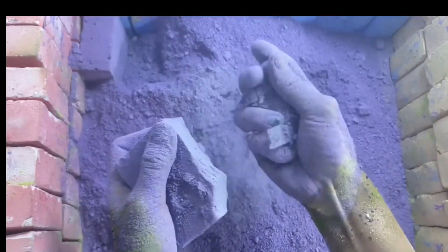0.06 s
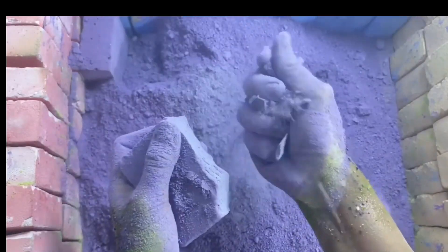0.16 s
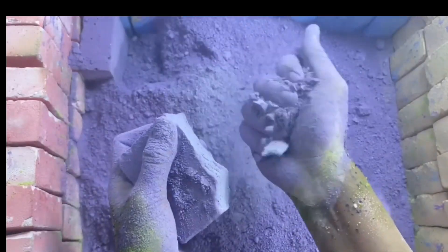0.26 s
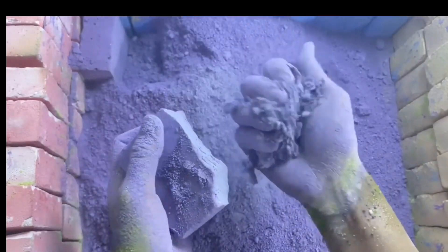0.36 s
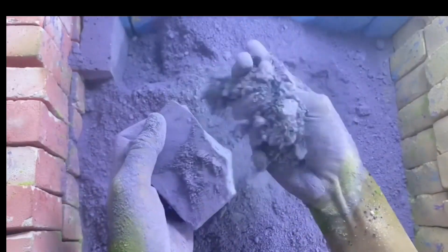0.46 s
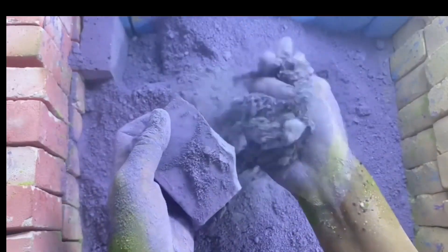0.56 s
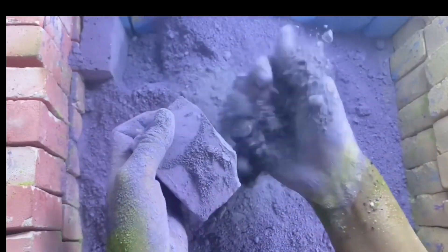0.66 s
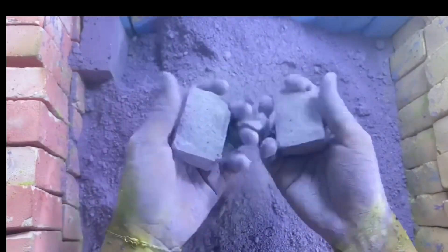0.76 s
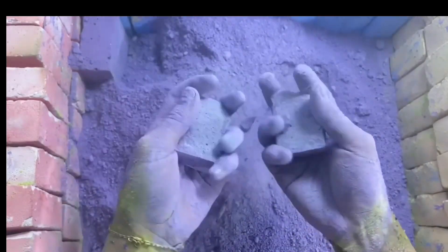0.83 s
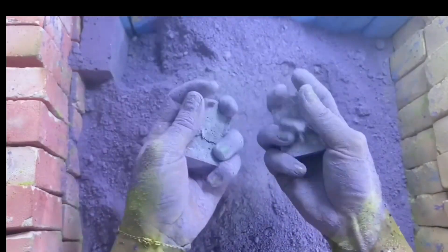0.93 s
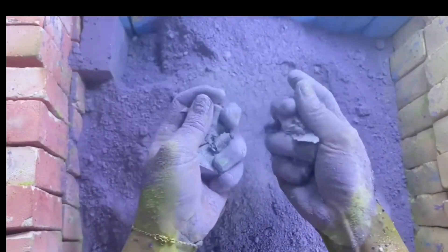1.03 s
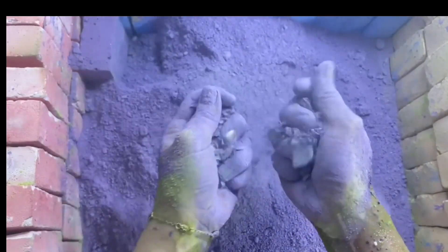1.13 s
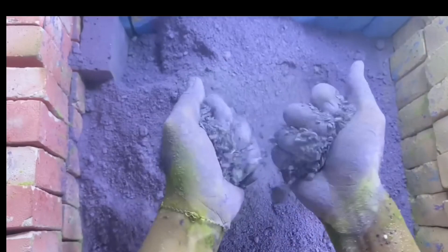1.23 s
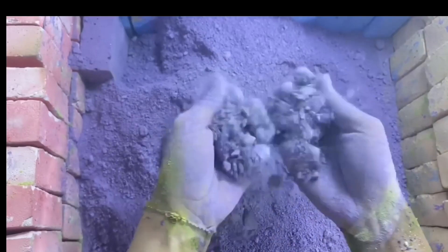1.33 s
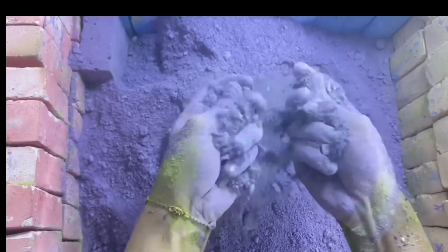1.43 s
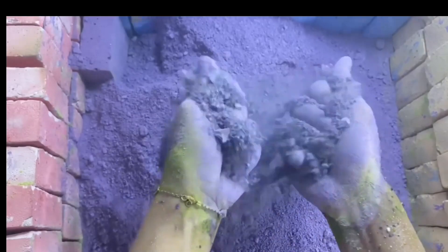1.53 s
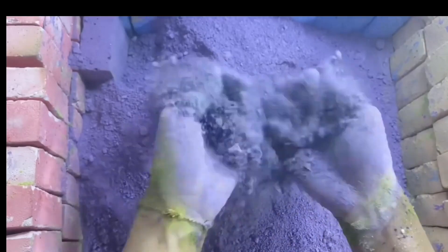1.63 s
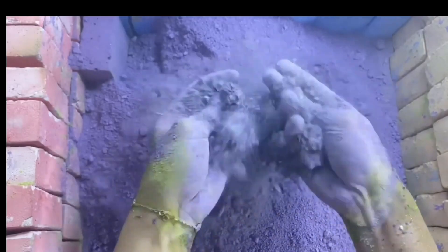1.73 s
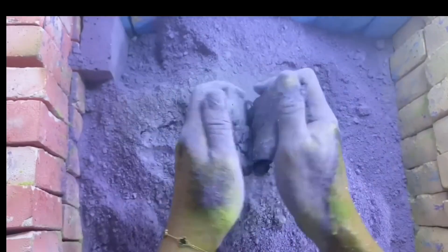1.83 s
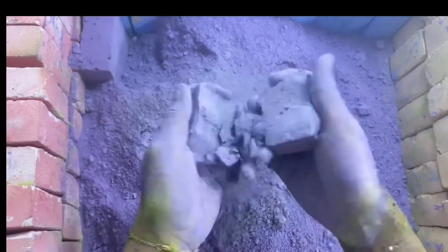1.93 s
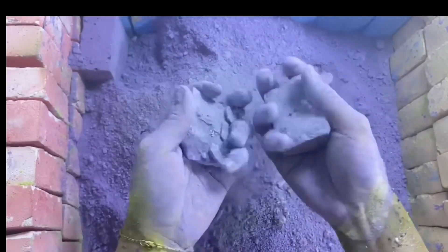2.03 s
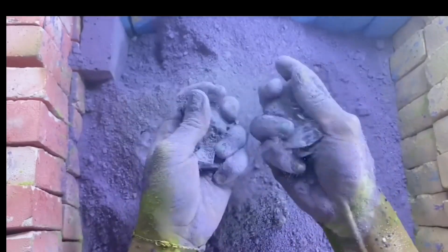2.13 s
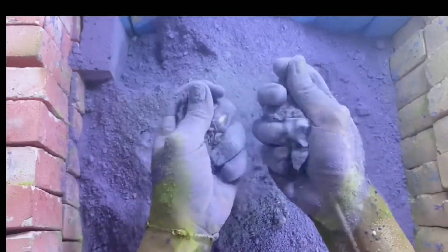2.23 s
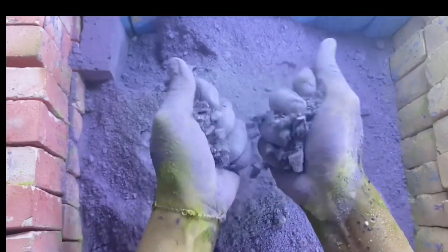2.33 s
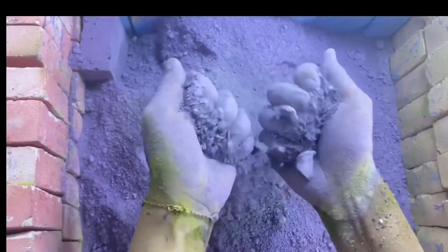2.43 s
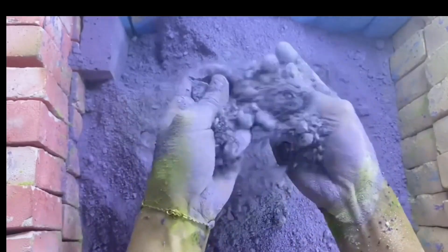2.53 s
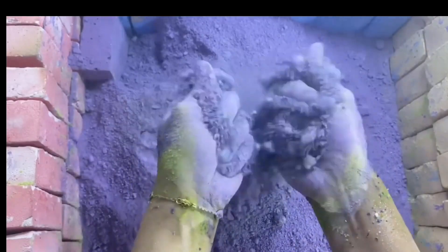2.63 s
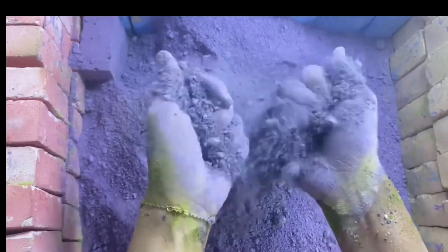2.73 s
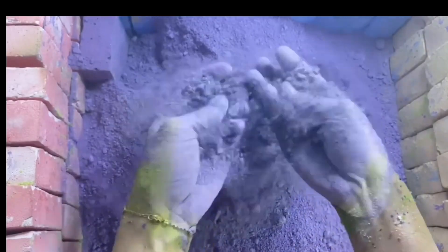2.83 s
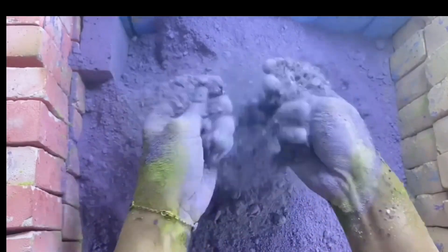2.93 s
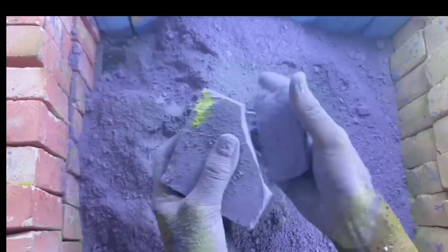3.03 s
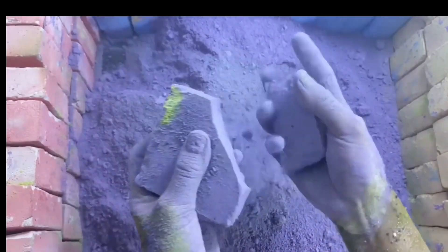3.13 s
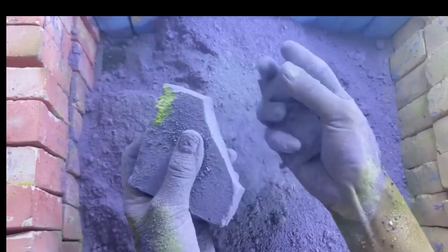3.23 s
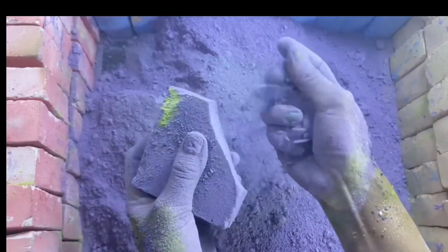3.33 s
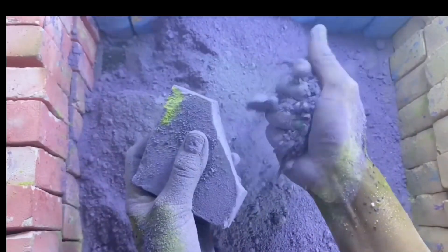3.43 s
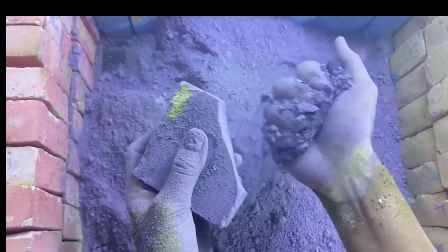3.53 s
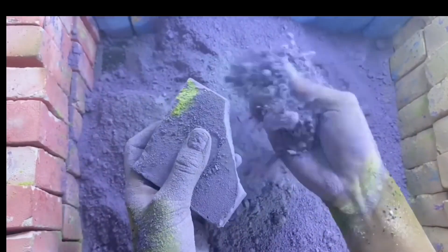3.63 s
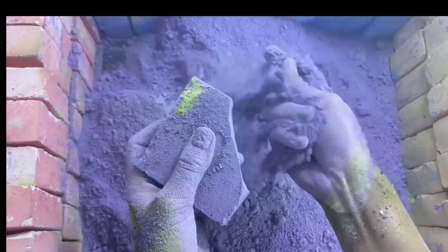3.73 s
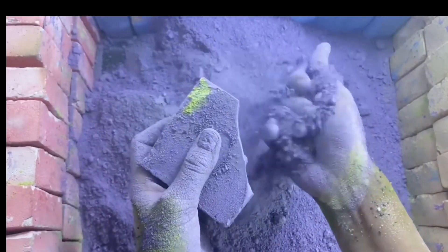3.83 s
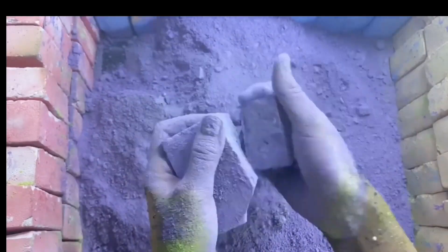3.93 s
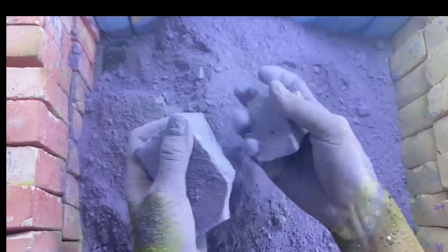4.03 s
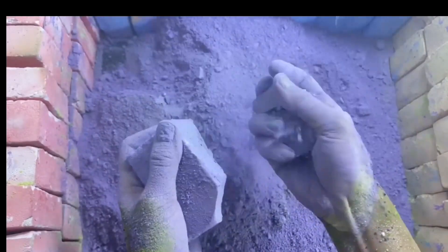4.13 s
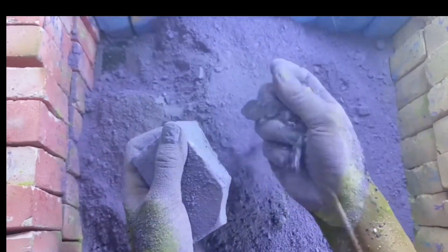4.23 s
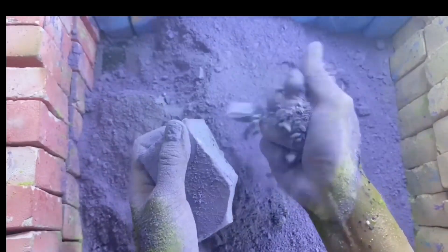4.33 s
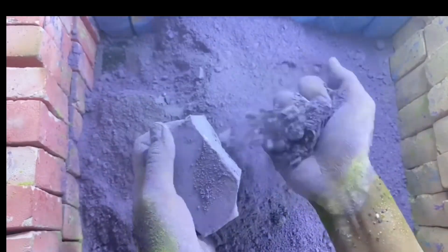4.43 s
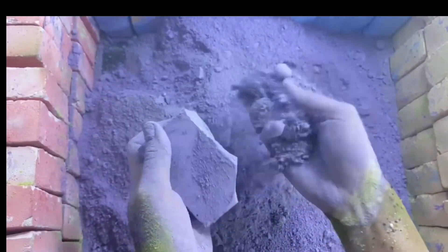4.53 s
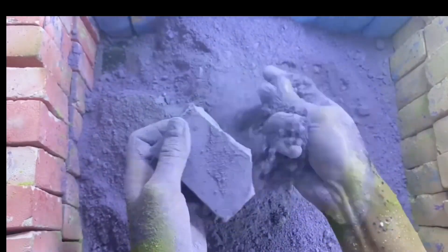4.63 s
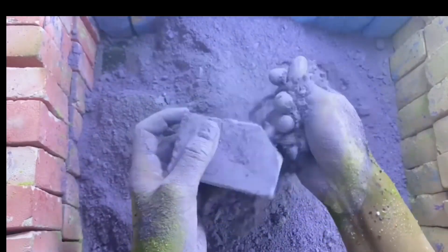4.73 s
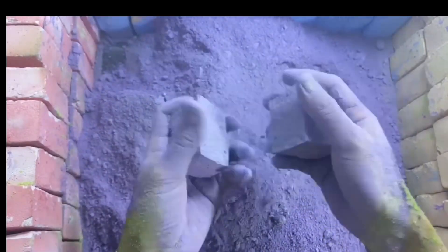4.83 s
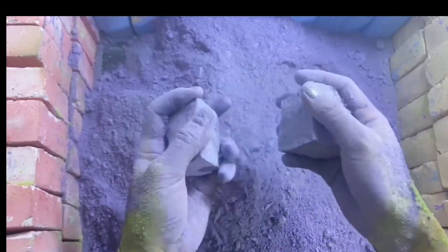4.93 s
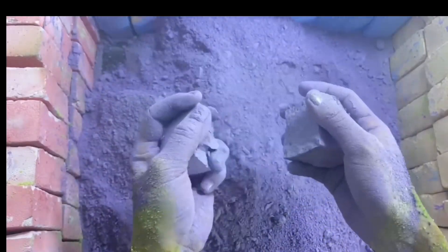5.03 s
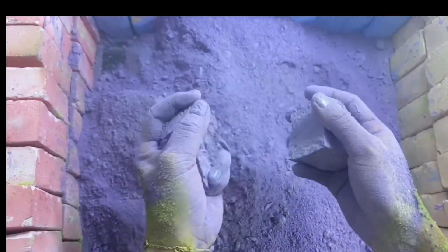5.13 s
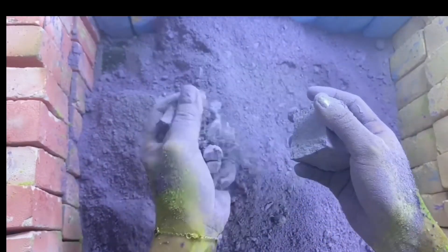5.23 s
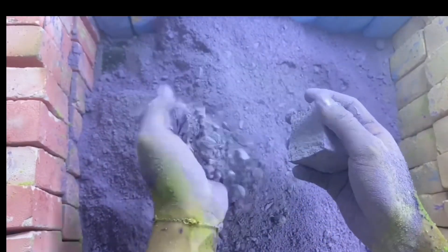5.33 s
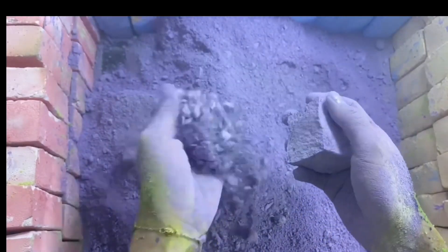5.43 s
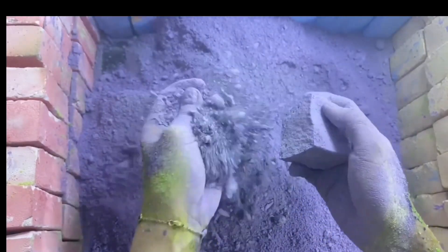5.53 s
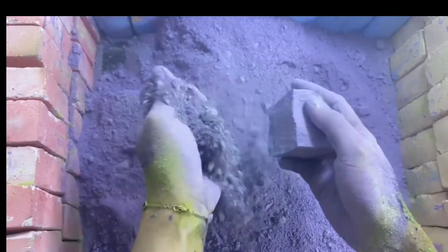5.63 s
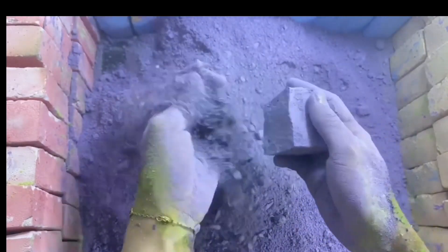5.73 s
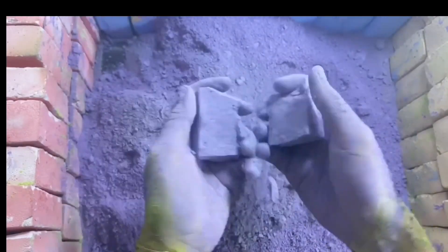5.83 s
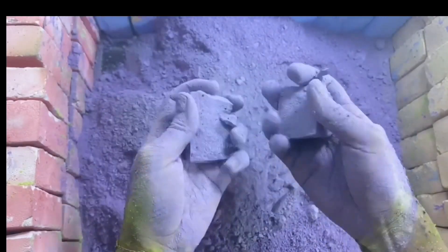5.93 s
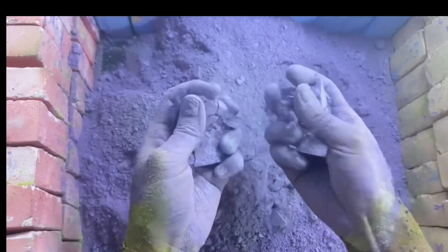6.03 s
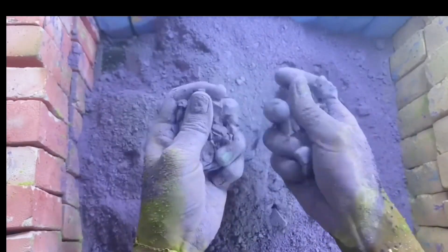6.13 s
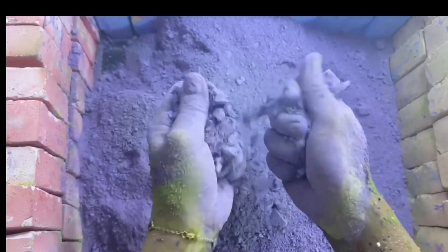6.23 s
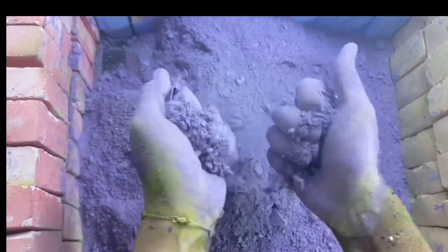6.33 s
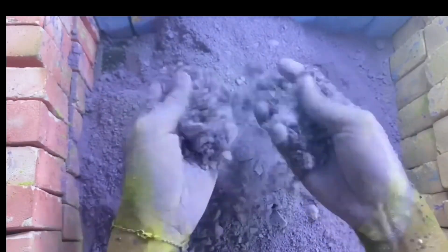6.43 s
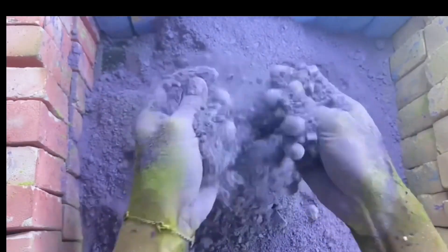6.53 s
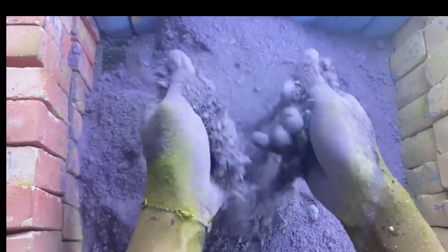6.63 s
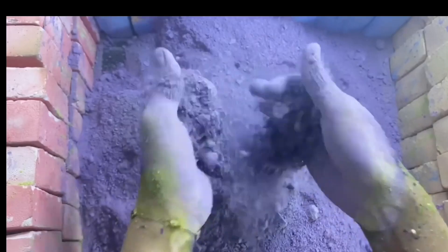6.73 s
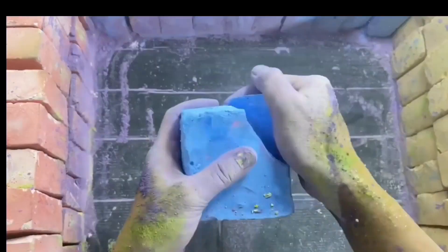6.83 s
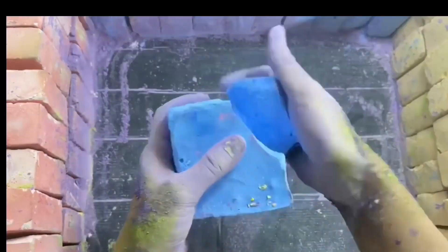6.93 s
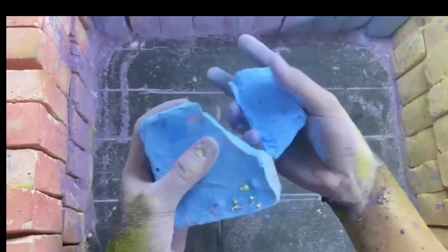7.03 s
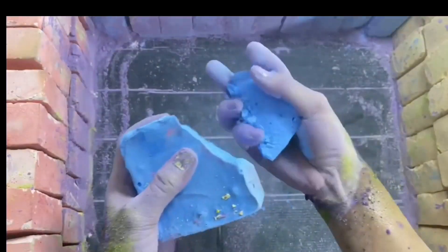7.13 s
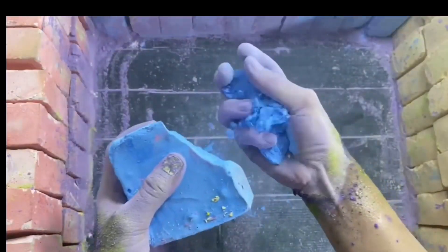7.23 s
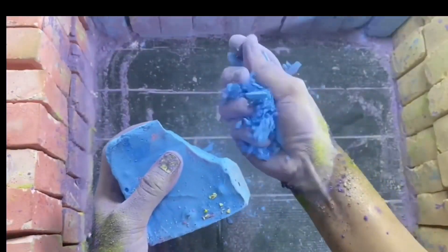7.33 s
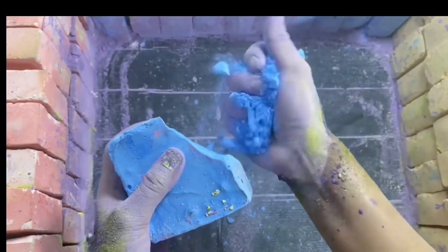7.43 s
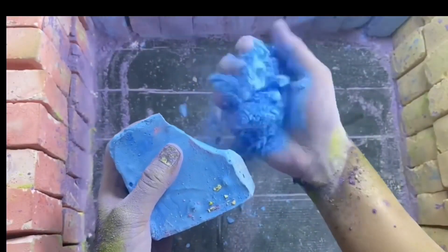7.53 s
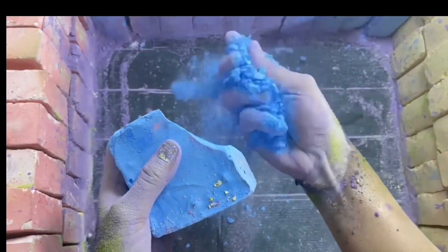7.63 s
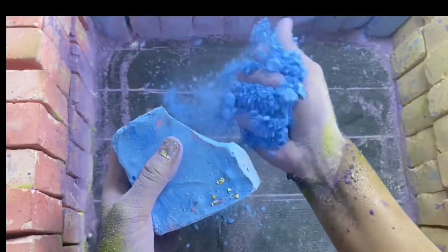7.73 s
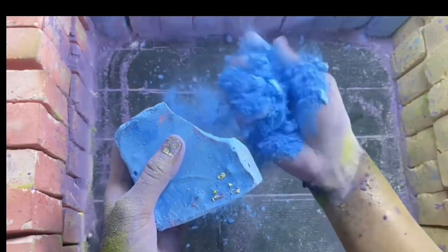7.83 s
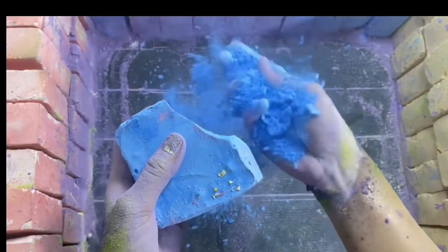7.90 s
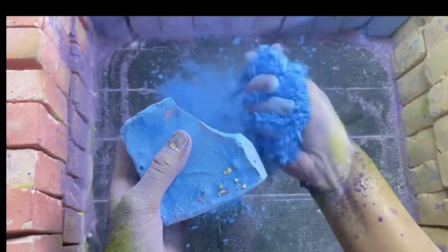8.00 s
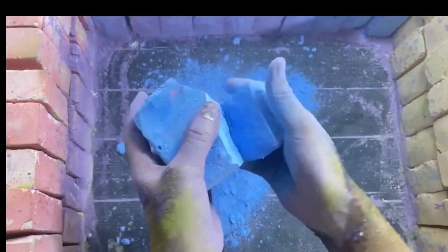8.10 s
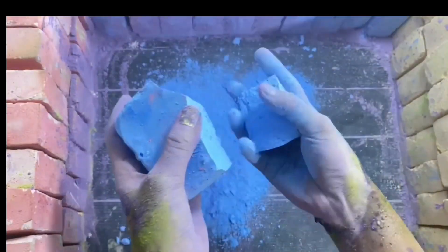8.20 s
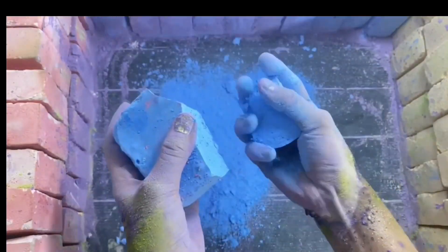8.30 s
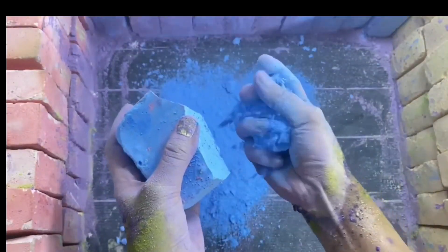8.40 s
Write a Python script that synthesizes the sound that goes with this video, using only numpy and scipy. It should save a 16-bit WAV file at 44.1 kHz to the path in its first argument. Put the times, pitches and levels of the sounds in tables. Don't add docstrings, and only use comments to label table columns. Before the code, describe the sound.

Close, dry and gritty: hands crush chalk blocks in rapid separate takes with abrupt cuts. A sharp crackling crunch opens at once, followed by a weaker one at 0.35 seconds. Faint skin rustle and ticks lead to strong fractures at 1.0, 2.15, 3.25, 4.2, 5.1 and 6.05, the one at 2.15 especially hard. Each bursts into tiny cracks, then eases into raining crumbs, dropping chunks and soft powder hiss on the pile, over a hollow tub resonance and low muffled boom. A short tick and thud come at 6.8. From 7.0 fragments strike a bare hard floor: brighter, with a crunch near 7.2, knocks around 7.3, and a loud clattering pour peaking at 7.6 to 7.7, slightly clipped. Bright dregs patter until 8.1, then a near-quiet moment and a final snap around 8.35. Short nearby reflections, faint steady hiss.

```python
import sys
import numpy as np
from scipy import signal
from scipy.fft import rfft, irfft, next_fast_len
from scipy.io import wavfile
from scipy.ndimage import uniform_filter1d, map_coordinates

SR = 44100
rng = np.random.default_rng(int(sys.argv[2]) if len(sys.argv) > 2 else 0)


def ratio_of_db(decibels):
    return 10 ** (np.asarray(decibels, float) / 20)


def transcribe(u):
    v = np.clip(np.atleast_2d(u).T, -1, 1)
    q = np.round(v * 32767).astype(np.int16)
    wavfile.write(sys.argv[1], SR, q)


N = 373086

# [start t/s, hush of the crumbs level/dB, rustle of the hands level/dB, tub level/dB, stand level/dB]
TAKES = [(0.0, -34.5, -50, -33.5, -37.5), (0.3, -51.5, -49, -33.5, -35.5),
         (0.74, -50.5, -44.5, -33.5, -36.5), (1.843, -57.5, -47.5, -33, -34.5),
         (3.015, -52, -43, -35, -34.5), (3.939, -51.5, -48, -34, -33.5), (4.838, -55, -44.5, -32, -31.5),
         (5.806, -58.5, -45.5, -34, -34), (6.792, -69, -60, -36, -31.5), (7.0, -47, -50, -33.5, -36.5),
         (8.103, -46.5, -48, -30.5, -33.5)]
# [block gives t/s, hardest t/s, hardest level/dB, easing time/s, rain of crumbs level/dB]
SQUEEZES = [(0.016, 0.06, -21.5, 0.3, -39), (0.353, 0.384, -37.5, 0.26, -37),
            (0.97, 1.018, -18, 0.22, -33.5), (2.096, 2.168, -23.5, 0.23, -33.5),
            (3.236, 3.26, -27.5, 0.23, -35.5), (4.141, 4.173, -26, 0.22, -34),
            (5.003, 5.11, -29.5, 0.63, -41), (6.012, 6.1, -22.5, 0.38, -35), (6.808, 6.804, -26, 0.15, -52),
            (7.175, 7.273, -27, 0.21, -38), (8.34, 8.385, -28, 0.067, -34)]
# [crumbs thicken dB/s, powder over its usual share level/dB, powder thickens dB/s]
RAINS = [(-3, 0, 0.1), (3, 1, 12), (-0.5, -2, 6), (2.5, 0.1, 0.5), (-1, 0, 6), (-13, 1, 7), (-1.5, 1, 10),
         (4.5, -1.5, 9.5), (0.5, 5, 2), (-1.5, -8, 0.1), (-1.5, -2, 0.1)]


def unit(x):
    return x / np.sqrt(np.mean(x ** 2) + 1e-20)


def along(points, hz):
    f, v = np.transpose(points)
    return np.interp(np.log(hz + 1), np.log(f + 1), v)


def wobble(rate):
    return map_coordinates(rng.standard_normal(int(N * rate / SR) + 4), [np.arange(N) * rate / SR])


def filtered(x, response):
    m = next_fast_len(N + SR // 2)
    gain = response(np.fft.rfftfreq(m, 1 / SR))
    gain = gain / np.sqrt(np.mean(np.abs(gain) ** 2))
    return irfft(rfft(x, m) * gain, m)[..., :N]


def colour(points):
    return lambda hz: ratio_of_db(along(points, hz))


def modes(table):
    def response(f):
        total = 0
        for k, (centre, width, db) in enumerate(table):
            band = 1j * f * width
            total = total + (-1) ** k * ratio_of_db(db) * band / (centre ** 2 - f * f + band)
        return total
    return response


def pair(alike):
    turn = np.arccos(np.clip(alike, -1, 1)) / 2
    a, b = rng.standard_normal((2, N))
    common, apart = np.cos(turn) * a, np.sin(turn) * b
    return np.array([common + apart, common - apart])


def patchy(x, depth_db):
    z = signal.stft(x, nperseg=256)[2]
    field = uniform_filter1d(rng.standard_normal(z.shape[1:]), size=5, axis=0)
    field = uniform_filter1d(field, size=7, axis=1)
    return unit(signal.istft(z * ratio_of_db(depth_db * unit(field)), nperseg=256)[1][:, :N])


def grains(rate, spread_db, life, bed):
    sizes = ratio_of_db(spread_db * np.minimum(rng.exponential(size=N), 3))
    starts = (rng.random(N) < rate / SR) * sizes
    train = signal.lfilter([1], [1, -np.exp(-1 / (life * SR))], starts)
    return unit(bed + unit(train))


def pings(count, spread_db, life, low_hz, high_hz):
    when, pitch, size, side, lag = rng.random((count, 5)).T[:, :, None]
    hz = low_hz * (high_hz / low_hz) ** pitch
    k = np.arange(200)
    t = k / SR
    level = ratio_of_db(-spread_db * np.log(size + 0.037)) * (hz / low_hz) ** 0.99
    ring = level * np.sin(2 * np.pi * hz * t) * np.exp(-t / (life * np.sqrt(low_hz / hz)))
    start = (when * N).astype(int) + k
    late = (lag * 24).astype(int)
    left = np.bincount(start.ravel(), (ring * np.sqrt(side)).ravel(), N)
    right = np.bincount((start + late).ravel(), (ring * np.sqrt(1 - side)).ravel(), N)
    return unit(np.array([left[:N], right[:N]]))


def steady_hiss():
    # [f/Hz, level per Hz/dB]
    air = [(300, -39), (820, 20), (1050, -5), (2500, -44), (5000, -8), (10000, 3.5), (14000, 6),
           (16000, -25)]
    return ratio_of_db(-48.5) * filtered(pair(.1), colour(air))


def walls(x):
    # [f/Hz, t60/s]
    wall_decay = [(300, 0.16), (2000, 0.083), (10000, 0.0057)]
    hz, t, z = signal.stft(rng.standard_normal((2, SR // 4)), SR, nperseg=256)
    decay = ratio_of_db(-60 * t / along(wall_decay, hz)[:, None])
    tail = signal.istft(z * decay, SR, nperseg=256)[1]
    return signal.fftconvolve(x, tail / np.linalg.norm(tail[0]), axes=1)[:, :N]


def cut_off():
    hard_cuts = [0.739, 1.843, 3.015, 3.938, 5.806, 6.793, 8.102]
    t = np.arange(N) / SR
    starts = np.r_[-1, hard_cuts]
    since = t - starts[np.searchsorted(starts, t, 'right') - 1]
    return ratio_of_db(-13.5 * np.exp(-since / 0.015))


def thuds():
    # [t/s, level/dB]
    landings = [(0.04, -10), (2.161, -7.5), (3.69, -13), (4.15, -13), (5.601, -17.5), (6.82, -17),
                (7.298, -15), (8.34, -15)]
    s, db = np.transpose(landings)
    return np.bincount((s * SR).astype(int), ratio_of_db(db + 19), N)


def hollow_tub(shaking, boom, push):
    # [f/Hz, width/Hz, level/dB]
    tub_modes = [(312.8, 32, 1), (387, 22.7, -3), (467.3, 23.4, -2.5)]
    # [f/Hz, width/Hz, level/dB]
    stand_modes = [(44.5, 34, -15.5), (95, 23.3, -0.5), (127.6, 30.3, -5), (194, 132, -19)]
    tub = filtered(shaking * pair(0.92) + push, modes(tub_modes))
    stand = filtered(boom * pair(0.92) + push + thuds(), modes(stand_modes))
    return tub + stand


def handfuls(t):
    knots = []
    ends = [row[0] for row in TAKES[1:]] + [N / SR]
    for take, squeeze, rain, end in zip(TAKES, SQUEEZES, RAINS, ends):
        cut, hush_db = take[:2]
        give, hard, db, ease, rain_db = squeeze
        last = end - .003
        eased = min(hard + ease, last)
        knots += [(cut, hush_db), (max(cut, give - 0.084), hush_db),
                  (give - .004, hush_db + 8.5),
                  (give, db - 5.5), (hard, db), (eased, rain_db),
                  (last, rain_db + rain[0] * (last - eased))]
    return np.interp(t, *np.transpose(knots))


def crumbling():
    # [t/s, level/dB]
    slide = [(7.0, -50), (7.004, -18.5), (7.163, -34.5), (7.18, -22), (7.264, -31), (7.41, -35)]
    # [t/s, level/dB]
    pour = [(7.412, -27), (7.416, -28), (7.56, -19.5), (7.596, -14), (7.603, -12), (7.63, -8),
            (7.728, -12.5), (7.85, -21.5)]
    # [t/s, level/dB]
    dregs = [(7.88, -24), (7.903, -15), (8.015, -22.5), (8.098, -21.5), (8.104, -69)]
    usual_db, coarse_db = -33, -10
    t = np.arange(N) / SR
    take = np.searchsorted(np.transpose(TAKES)[0], t, 'right') - 1
    cut, _, rustle_db, tub_db, stand_db = np.array(TAKES)[take].T
    _, share_db, thickens = np.array(RAINS)[take].T
    late = np.maximum(t - np.array(SQUEEZES)[take, 1], 0)
    flow_db = np.interp(t, *np.transpose(slide + pour + dregs), left=-90, right=-90)
    hands_db = handfuls(t)
    crumbs = np.hypot(ratio_of_db(hands_db), ratio_of_db(flow_db + coarse_db) * (t > pour[0][0]))
    over_db = 20 * np.log10(crumbs) - usual_db
    rustle = ratio_of_db(rustle_db - 4 * np.exp(-(t - cut) / 0.03)) * (late == 0)
    sift = ratio_of_db(-40.5 + 0.95 * (hands_db - usual_db) + share_db + thickens * late)
    powder = np.sqrt(sift ** 2 + rustle ** 2 + ratio_of_db(2 * flow_db))
    tub = ratio_of_db(tub_db + 0.41 * over_db)
    shake_db = uniform_filter1d(over_db, size=round(0.02 * SR))
    stand = ratio_of_db(stand_db + 0.2 * shake_db - late)
    lumps = 1.6 * wobble(35) + 1.6 * wobble(70)
    shares = (0.66, 0.73, 0.29, 0.32)
    trims_db = (-1.24, 0.9, -0.73, 1.9)
    return [gain * ratio_of_db(trim + share * (lumps + 3.4 * wobble(40)))
            for gain, share, trim in zip((crumbs, powder, tub, stand), shares, trims_db)]


def chalk_grit(strength, coarse):
    # [f/Hz, level per Hz/dB]
    crumb_colour = [(350, -43), (560, -6), (1300, -5), (2400, -5.5), (3300, -10), (4500, -10), (8000, -29)]
    # [f/Hz, width/Hz, level/dB]
    hollows = [(600, 65, -5.5), (842, 36, 0.5), (1180, 130, 1.5), (1580, 184, 0.5), (1980, 130, 0.5),
               (2450, 730, -4.5), (3460, 740, -4)]
    grit = 0.97 * coarse * patchy(pair(0.33), 2)
    grit += .2 * pings(count=4000, spread_db=3.5, life=0.003, low_hz=570, high_hz=4500)
    return filtered(strength * grit, lambda hz: colour(crumb_colour)(hz) * (0.46 + abs(modes(hollows)(hz))))


def powder_hiss(strength):
    # [f/Hz, level per Hz/dB]
    pile_colour = [(1800, -37), (3000, -8), (4200, -4), (6000, -3.5), (8000, -9), (10500, -8.5),
                   (13500, -13.5), (15000, -15), (16500, -44)]
    # [f/Hz, level per Hz/dB]
    floor_colour = [(1700, -17.5), (2800, -6), (3530, -6), (4100, -5), (4750, -2.5), (6300, -3),
                    (8500, -11.5), (10300, -10), (13700, -18.5), (16500, -34)]
    # [f/Hz, width/Hz, level/dB]
    tiles = [(3500, 310, 3), (4720, 380, -0.5)]
    # [from t/s, to t/s]
    bare_span = (7.0, 8.1)
    fine = grains(1300, 2.0, life=0.0016, bed=6.8)
    sand = 0.94 * fine * patchy(pair(0.1), 2)
    sand += .25 * pings(count=7000, spread_db=4.5, life=0.0042, low_hz=2936, high_hz=10640)
    hiss = strength * sand
    t = np.arange(N) / SR
    bare = (t > bare_span[0]) & (t < bare_span[1])
    on_pile = filtered(hiss * ~bare, colour(pile_colour))
    on_floor = filtered(hiss * bare * ratio_of_db([[1.6], [-1.6]]),
                        lambda hz: colour(floor_colour)(hz) * (1 + abs(modes(tiles)(hz))))
    return on_pile + on_floor


def contacts():
    # [t/s, peak level/dB, dust above it/dB, tub above it/dB, ring f/Hz]
    grips = [(0.895, -13.5, -6, -1.5, 610), (0.922, -21, -15, -5, 1500), (0.945, -20, -17, -2, 1210),
             (2.097, -28, -4, -1, 1550), (2.117, -32, 5.5, 20, 1140), (3.192, -23, -28, -6, 800),
             (4.137, -17.5, -4, 4, 847), (5.007, -22, -21, -21, 1690), (5.032, -20.5, -9, 1, 604),
             (5.992, -20.5, -29, -4, 2660), (6.815, -12, -10, -2, 1940), (6.966, -25.5, -15, 1.5, 1340),
             (8.312, -18, -23, -23, 717), (8.341, -15, -23, -3.5, 824)]
    # [t/s, peak level/dB, dust above it/dB, tub above it/dB, ring f/Hz]
    fractures = [(0.032, -10, -11.5, 1.5, 1630), (0.092, -3, -24, -14, 1140), (0.158, -8, -18, -29, 1156),
                 (0.974, -7, -18, -5, 1200), (1.008, -5, -18, -10, 1950), (1.102, -7, -18, -11, 1336),
                 (2.146, 1, -13.5, -10.5, 1520), (2.189, 0.5, -22, -8, 1150),
                 (2.315, -10.5, -18, -7.5, 1580), (3.234, -3, -17, -6.5, 620), (3.289, -15, -25, -17, 1150),
                 (3.334, -4.5, -14.5, -3.5, 1270), (4.179, -5.5, -29, -9, 2495), (4.22, 0.5, -22, -9, 1584),
                 (5.098, -7.5, -22, -9.5, 1260), (5.181, -9, -25, -5, 1180), (6.025, -3, -12.5, -2.5, 1210),
                 (6.139, -16, -10, -11, 1250), (6.166, -7.5, -28, -7, 640), (6.26, -6.5, -13.5, -18, 1140),
                 (6.302, -8.5, -30, -20, 1630), (6.386, -7, -45, -6.5, 974), (8.378, -7, -21, -9, 2600)]
    # [t/s, peak level/dB, tub above it/dB, ring f/Hz]
    chunks = [(0.409, -14.5, -23, 1160), (0.472, -28, -22, 1290), (1.276, -19, -24, 2430),
              (1.322, -16, -3, 1130), (1.48, -13.5, -14, 1456), (1.586, -14, -22, 2300),
              (2.272, -8, -23, 810), (2.288, -7.5, -11, 1180), (2.361, -12, -16, 1294),
              (2.404, -11, -13, 1297), (2.826, -22, -4, 1960), (2.968, -17, -18, 1270),
              (3.422, -13.5, -10, 1280), (3.548, -24, -7, 1960), (3.68, -14, 1.5, 847),
              (3.93, -13, -10, 1260), (4.293, -22, 0, 800), (4.315, -20, -14, 1530), (4.445, -20, 6, 940),
              (4.482, -15, -33, 972), (4.538, -16, -1, 1630), (4.552, -20, -6, 1650),
              (5.224, -20.5, 1, 1270), (5.245, -10, -5, 1580), (5.534, -16, -21, 2920),
              (5.79, -24.5, -26, 1980), (6.42, -14.5, -6, 1590), (6.55, -13, -3.5, 980),
              (6.653, -14.5, -5.5, 630)]
    # [t/s, peak level/dB, dust above it/dB, ring f/Hz]
    strikes = [(7.045, -13, 3.5, 3970), (7.069, -18, 5, 4150), (7.18, -7.5, -6, 3100),
               (7.191, -1.5, -7, 3170), (7.23, -6, -28, 1580), (7.277, -0.5, -21, 810),
               (7.313, -15.5, 6.5, 4500), (7.337, -2.5, -38, 825), (7.415, -14, 2, 4430),
               (7.444, -13, 2, 3440), (7.467, -13.5, 4.5, 4310), (7.512, -8, 5, 3500),
               (7.559, -11, -3, 4100), (7.602, 13.5, -23, 3450), (7.631, 1, 2, 3280), (7.652, 0, -11, 4650),
               (7.704, 7, -21, 3560), (7.764, 0, -13, 3500), (7.818, -21, -3, 4440),
               (7.906, -0.5, -2.5, 3560), (7.94, -7.5, -2.5, 3620), (7.968, -23, -14, 3450),
               (7.998, -12, 9.5, 3950), (8.022, -7.5, -4, 3900)]
    # [t/s, peak level/dB, dust above it/dB, tub above it/dB, ring f/Hz]
    tears = [(0.994, -5.5, -16, -11.5, 1860), (1.09, -16, -18, -14, 1340), (3.28, -7.5, -25, -22, 3900),
             (3.36, -2, -23.5, -27, 3090), (4.185, -15, -25, -17, 2450), (5.11, -16, -15.5, -18, 3000),
             (6.033, -10, -13, -13, 1600), (7.5, -4.5, -4, -29, 3220), (8.005, -12, 0, -30, 3950)]
    # [t/s, peak level/dB, dust above it/dB, tub above it/dB, ring f/Hz]
    brushes = [(0.809, -36.5, 7.5, -8, 5000), (3.028, -42, 15.5, -13, 5500), (3.122, -23, -2.5, -15, 2500),
               (4.045, -29, -5, -2, 805), (5.929, -42, 5, -10, 6040), (6.678, -34.5, 8, -10, 5000),
               (8.265, -30, -3, -14, 4500)]
    # [t/s, peak level/dB, ring f/Hz]
    knocks = [(3.13, -16, 2530), (3.682, -8, 806), (4.19, -8, 2490), (4.445, -17, 564), (4.555, -16, 560),
              (4.976, -25, 710), (6.968, -18, 1300), (7.28, -2, 603), (7.338, -9, 905), (7.706, 3, 596),
              (2.405, -18, 1186)]
    snap, tear = 0.00092, 0.013

    def floor_tub_db(hz):
        return -10.5 - 4.5 * np.log2(hz / 1000)

    rows = [(s, db, dust, tub, 0, 0.12, hz, snap) for s, db, dust, tub, hz in grips]
    rows += [(s, db, dust, tub, 0, 0.075, hz, snap) for s, db, dust, tub, hz in fractures]
    rows += [(s, db, -33 - db, tub, 0, 0.062, hz, snap) for s, db, tub, hz in chunks]
    rows += [(s, db, dust, floor_tub_db(hz), 0, 0.065, hz, snap) for s, db, dust, hz in strikes]
    rows += [(s, db, dust, tub, 0, 0.07, hz, tear) for s, db, dust, tub, hz in tears + brushes]
    rows += [(s, db, -30, -25, -19, 0.085, hz, snap) for s, db, hz in knocks]
    return rows


def snapping():
    burst, ring, push = np.zeros((3, N + SR)), np.zeros((2, N + SR)), np.zeros(N)
    t = np.arange(SR // 10) / SR
    first = 1 + np.array([[.5], [-.75], [.3]]) * np.exp(-t / .004)
    for s, db, dust_db, tub_db, crunch, t60, hz, rise in contacts():
        n = round(s * SR)
        span = slice(n, n + len(t))
        steps = rng.standard_normal((1, len(t))) * np.sqrt(2 * np.pi * 149 / SR)
        phase = 2 * np.pi * rng.random((2, 1)) + np.cumsum(steps, axis=1)
        fall = ratio_of_db(-60 * np.maximum(t - rise, 0) / t60) * np.minimum(t / rise, 1)
        levels = ratio_of_db(np.array([[db + crunch - 15.0], [db + dust_db + 0.12], [db + tub_db - 5]]))
        burst[:, span] += levels * fall * first
        ring[:, span] += ratio_of_db(db - 11.0 - 0.35 * crunch) * fall ** 1.22 * np.sin(2 * np.pi * hz * t + phase)
        push[n] = ratio_of_db(db + tub_db + 13.5)
    return *burst[:, :N], ring[:, :N], push


def scene():
    crumbs, powder, tub, boom = crumbling()
    crack, dust, knock, ring, push = snapping()
    coarse = grains(500, 6.6, life=0.0037, bed=1.0)
    hollow = hollow_tub(np.hypot(tub, knock) * coarse, boom, push)
    chalk = ring + chalk_grit(np.hypot(crumbs, crack), coarse) + powder_hiss(np.hypot(powder, dust))
    left, right = chalk + hollow
    near = np.array([left, np.roll(right, 5)])
    return cut_off() * (near * ratio_of_db([[.45], [-.45]]) + ratio_of_db(-8.5) * walls(chalk))


def lose_bands(left, right):
    # [from f/Hz, to f/Hz]
    lost_bands = [
        [(11150, 12750)],
        [(9700, 10800), (13150, 14600), (15300, 16000)],
    ]

    def kept(hz):
        return np.array([np.prod([(hz < lo) | (hz > hi) for lo, hi in bands], axis=0) for bands in lost_bands])

    whole = np.array([left + right, left - right])
    power = np.diff(whole[0], prepend=0) ** 2
    before = np.roll(uniform_filter1d(power, size=1024) + 1e-12, 512)
    jump = uniform_filter1d(power, size=128) / before
    sudden = np.clip(uniform_filter1d(1. * (jump > 6), size=500) * 10, 0, 1)
    mid, side = filtered(whole, kept) * (1 - sudden) + 0.94 * whole * sudden
    return np.array([mid + side, mid - side]) / 2


def low_pass(x):
    return signal.sosfilt(signal.butter(12, 15250, fs=SR, output="sos"), x)


def record(dry):
    left, right = dry + steady_hiss()
    thinned = lose_bands(left, right)
    clipped = thinned / (1 + abs(thinned / 1.05) ** 8) ** (1 / 8)
    return low_pass(clipped)


dry = scene()
out = record(dry)
transcribe(out)
```